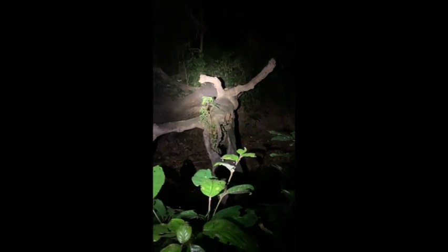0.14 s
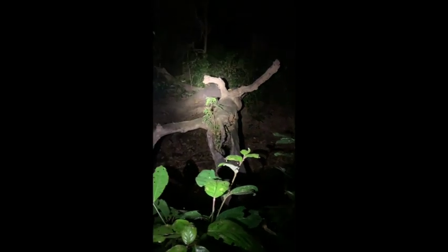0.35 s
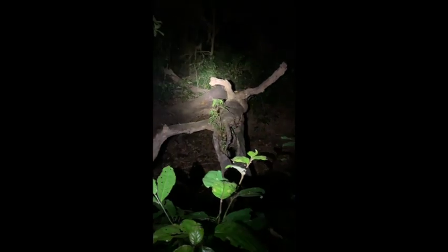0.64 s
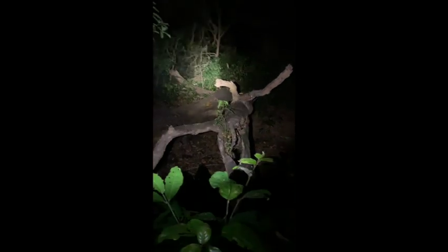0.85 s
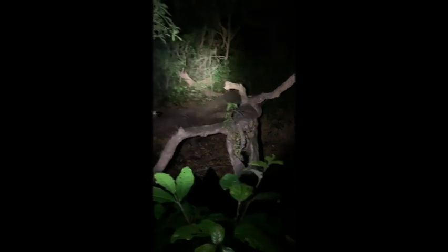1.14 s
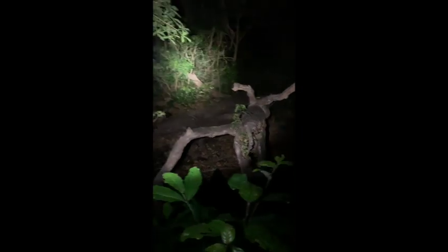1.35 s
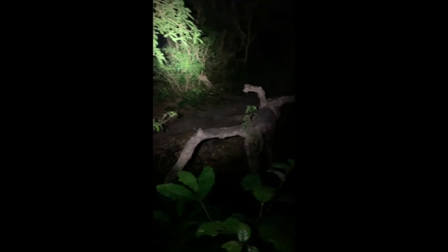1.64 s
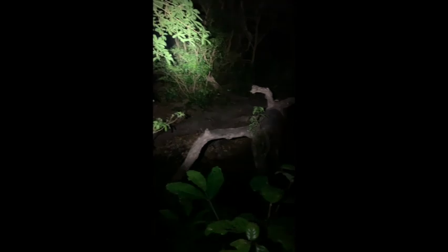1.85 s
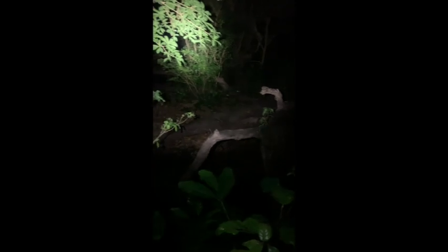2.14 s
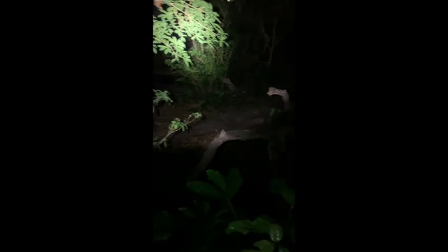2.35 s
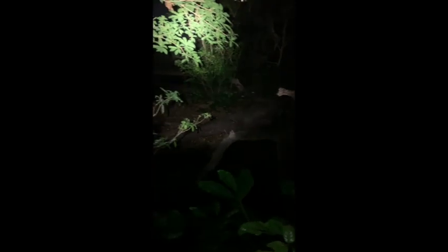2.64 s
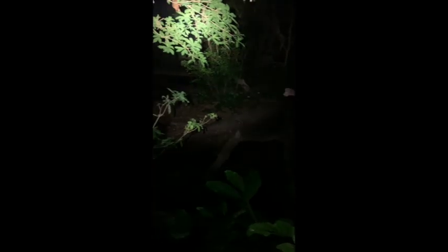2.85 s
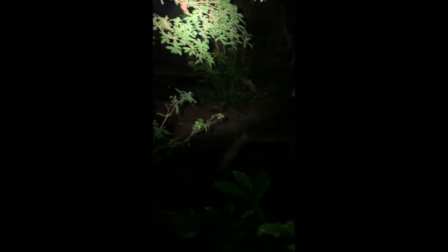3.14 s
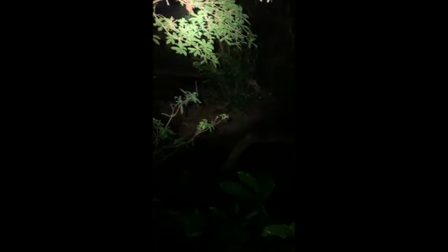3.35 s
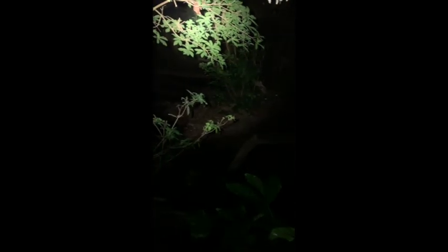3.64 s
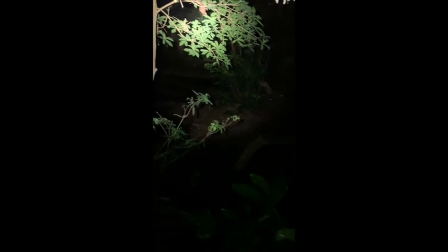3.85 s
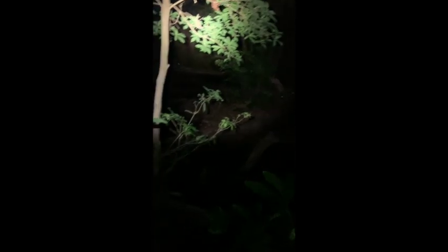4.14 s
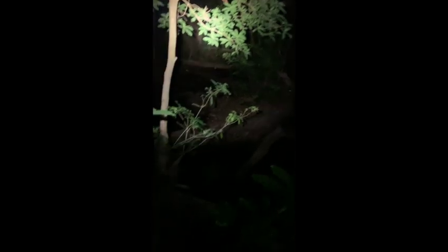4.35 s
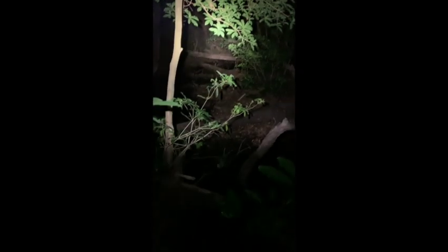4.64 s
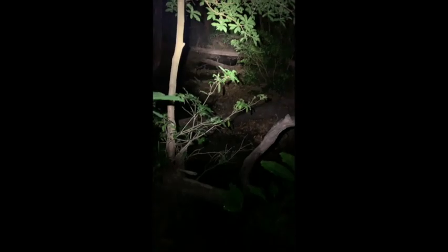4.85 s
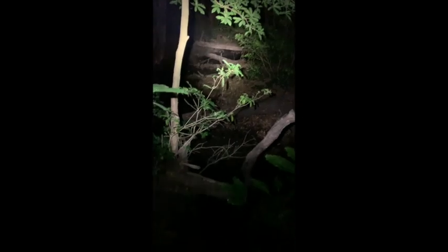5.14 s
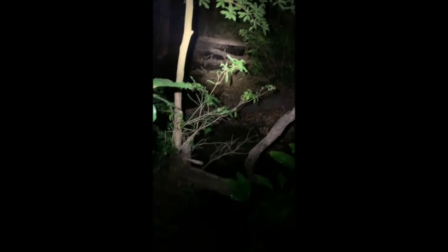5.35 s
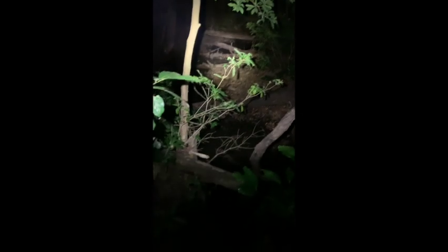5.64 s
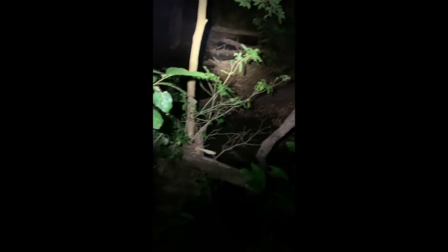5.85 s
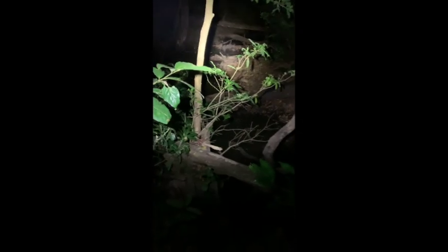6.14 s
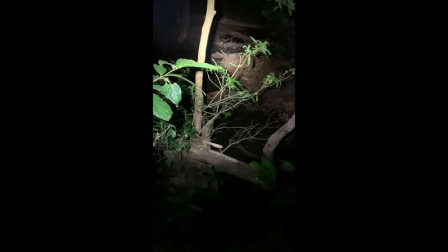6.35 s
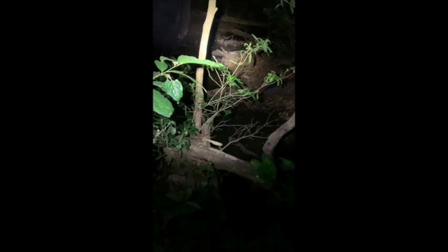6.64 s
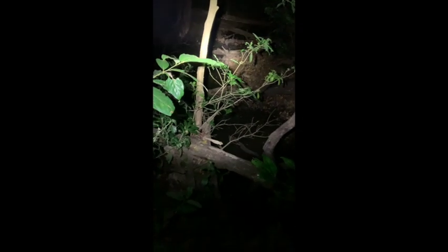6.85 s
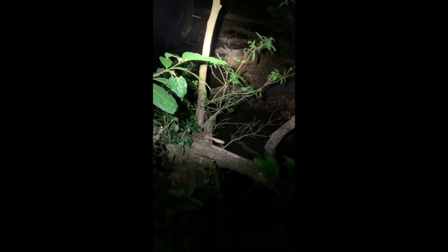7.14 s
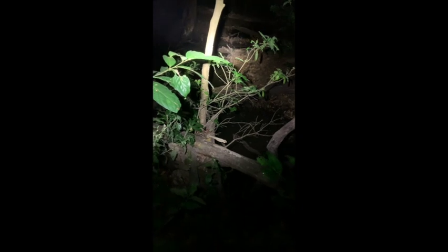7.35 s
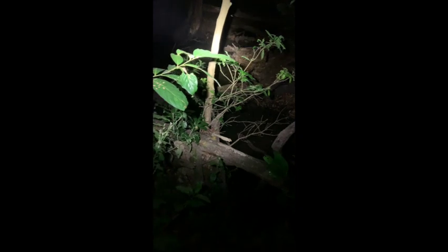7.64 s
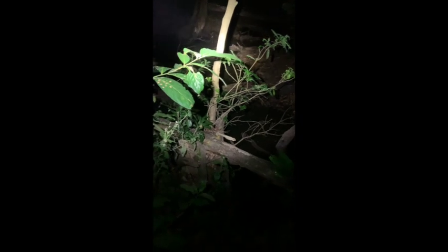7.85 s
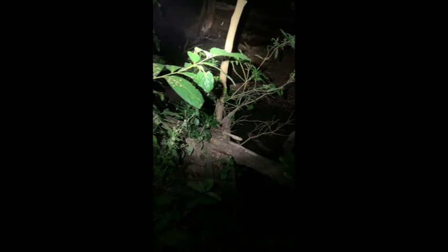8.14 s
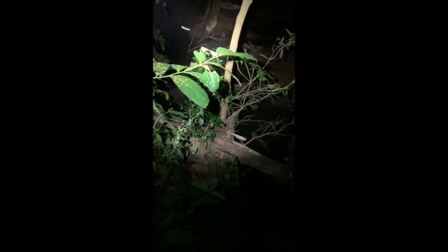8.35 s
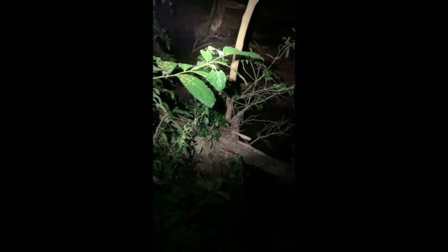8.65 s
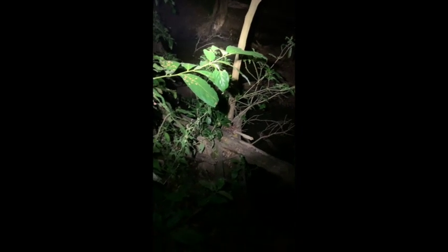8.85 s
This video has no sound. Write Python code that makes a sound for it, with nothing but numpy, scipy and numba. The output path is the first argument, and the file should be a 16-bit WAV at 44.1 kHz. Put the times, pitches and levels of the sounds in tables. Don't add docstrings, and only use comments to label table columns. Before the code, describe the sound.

A rainforest at night, filled with a continuous high drone of crickets and throbbing, swelling katydids. Twigs tick softly; then three near frogs call one after another, five quick notes each. Every note knocks and creaks faster into a short nasal whine, shut by a cluck. The second and third bouts are louder and nearly continuous. Handheld stereo phone, slight hand bumps, short echo from trees.

```python
import sys
import numpy as np
from scipy import signal
from scipy.fft import rfft, irfft
from scipy.io import wavfile
from scipy.ndimage import uniform_filter1d
from numba import njit

SR = 44100
rng = np.random.default_rng(int(sys.argv[2]) if len(sys.argv) > 2 else 0)


def volts_from_db(level):
    exponent = np.asarray(level, float) / 20
    return 10 ** exponent


def to_wav(sig):
    pcm = np.clip(np.atleast_2d(sig), -1, 1) * 32767
    pcm = np.round(pcm).astype(np.int16)
    wavfile.write(sys.argv[1], SR, pcm.T)


N = 396900
TIME = np.arange(N) / SR
FROG_LAG, CRICKET_LAG, KATYDID_LAG = 5., 4.3, 5.4


def curve(rows):
    s, *columns = np.transpose(rows)
    return [np.interp(TIME, s, c) for c in columns]


def unit(x):
    return x / np.sqrt(np.mean(x ** 2))


def smooth_twice(x, samples):
    return uniform_filter1d(uniform_filter1d(x, samples), samples)


@njit
def svf(x, hz, width):
    y, b, l = np.empty(len(x)), 0., 0.
    for i in range(len(x)):
        g, k = np.tan(np.pi * hz[i] / SR), width / hz[i]
        v = (b + g * (x[i] - l)) / (1 + g * (g + k))
        b, l, y[i] = 2 * v - b, l + 2 * g * v, k * v
    return y


def ring(x, hz, width_hz):
    hz = np.clip(hz + np.zeros(len(x)), 20, SR * .45)
    once = svf(x + 1e-18, hz, 1. * width_hz)
    return svf(once, hz, 1. * width_hz)


def band(x, lo_hz, hi_hz):
    return signal.sosfilt(signal.butter(4, [lo_hz, hi_hz], "bandpass", fs=SR, output="sos"), x)


@njit
def beat(hz, rough, chance, scatter):
    out, p, k = np.zeros(len(hz) + 1), 0., 0
    for i in range(len(hz)):
        step = hz[i] * np.exp(rough[i] * chance[k, 0]) / SR
        p += step
        if p >= 1:
            p, k = p - 1, k + 1
            size = np.exp(scatter * rough[i] * chance[k, 1]) / np.sqrt(hz[i] / SR)
            out[i] += size * p / step
            out[i + 1] += size * (1 - p / step)
    return out[:-1]


def pulses(hz, rough, scatter=1.14):
    chance = rng.standard_normal((N // 4, 2))
    return beat(hz + np.zeros(N), rough + np.zeros(N), chance, scatter)


def rasp(lo_hz, hi_hz, rate_hz, rough):
    return band(pulses(rate_hz, rough), lo_hz, hi_hz)


def walk(rate_hz):
    k = int(SR / rate_hz)
    return smooth_twice(np.repeat(rng.standard_normal(N // k + 1), k), k)[:N]


def spikes(rows):
    out = np.zeros(N)
    for s, db in rows:
        out[int(s * SR)] += volts_from_db(db)
    return out


def phrases(rows, fade_s):
    out = np.zeros(N)
    for s, length_s, open_db, close_db in rows:
        level = volts_from_db(np.interp(TIME, [s, s + length_s], [open_db, close_db]))
        out += level * (TIME >= s) * (TIME < s + length_s)
    return smooth_twice(out, int(fade_s * SR))


def ears(x, lag, pan_db=0.):
    late = irfft(rfft(x) * np.exp(-2j * np.pi * np.arange(N // 2 + 1) / N * lag), N)
    return np.array([x * volts_from_db(pan_db / 2), late * volts_from_db(-pan_db / 2)])


def trees(x, t60_s):
    t = np.arange(int(.6 * SR)) / SR
    tail = rng.standard_normal((2, len(t))) * 1000. ** (-t / t60_s) * np.clip(t / 0.0021, 0, 1)
    tail = tail / np.sqrt(np.sum(tail ** 2, 1))[:, None]
    return signal.fftconvolve(x[None], tail, axes=1)[:, :N]


# frequency in Hz, density in dB per Hz.
AIR_SPECTRUM = [(15, -27), (25, -9.5), (59, -1.5), (321, -8.5), (365, -6), (503, -12), (637, -11.5),
                (917, -11.5), (1240, -8.5), (1470, -9), (2160, -13.5), (4200, -13), (5460, -30.5),
                (9240, -120)]
# frequency in Hz, side minus mid in dB.
AIR_WIDTH = [(60, -16), (110, -5), (200, -3.5), (380, 1.5), (700, 8.5), (1290, 1.5), (2380, 8.5), (4400, 2),
             (8120, -35), (15000, -3.5)]
# time in seconds, gain in dB.
BREEZE_RUMBLE = [
    (4.9, 1),
    (5.5, 1),
    (6.6, -3),
]


def air():
    hz = np.maximum(np.arange(N // 2 + 1) * SR / N, 1)

    def gain(rows):
        row_hz, row_db = np.transpose(rows)
        return volts_from_db(np.interp(np.log(hz), np.log(row_hz), row_db))

    mid = rfft(rng.standard_normal(N)) * gain(AIR_SPECTRUM)
    side = rfft(rng.standard_normal(N)) * gain(AIR_SPECTRUM) * gain(AIR_WIDTH)
    ports = np.array([mid + side, mid - side])
    rumble = irfft(ports / (1 + (hz / 230) ** 4), N)
    sway = volts_from_db(0.5 * walk(3.03) + 2.8 * walk(18))
    breezy = irfft(ports, N) + (volts_from_db(curve(BREEZE_RUMBLE)[0]) - 1) * rumble
    return volts_from_db(-56.5) * sway * breezy / irfft(mid, N).std()


# time in seconds, level in dB, pitch in Hz.
HAND_BUMPS = [
    (3.892, -49, 97),
    (5.299, -52, 56.5),
    (5.392, -46, 70.0),
    (5.507, -42.5, 104.1),
    (5.789, -39.5, 121.5),
    (6.049, -47, 65),
]
# time in seconds, level in dB.
TWIG_TICKS = [
    (0.6518, -40.5),
    (0.9697, -51),
    (1.5424, -37.5),
    (2.7004, -43),
]


def handling():
    ticks = smooth_twice(spikes(TWIG_TICKS), 500) * 22 * pulses(2500, .45)
    out = volts_from_db(26) * band(ticks, 290, 12600)
    for s, db, hz in HAND_BUMPS:
        t = np.clip(TIME - s, 0, 1)
        fall = 1 + 1.13 * np.exp(-t / 0.0077)
        out += volts_from_db(db) * np.exp(-t / 0.023) * np.sin(2 * np.pi * hz * t * fall)
    return out


def singer(clicks, flicker_db, wet_db, lag=KATYDID_LAG):
    x = unit(clicks * volts_from_db(flicker_db * walk(12)))
    return unit(ears(x, lag) + volts_from_db(wet_db) * trees(x, 0.18))


def distant_insects():
    crickets = volts_from_db(-52) * singer(rasp(4360, 5420, 4000, .4), 1.1, 0.55, CRICKET_LAG)
    katydids = band(rasp(6070, 8340, 4000, .4), 6070, 8340)
    return crickets + volts_from_db(-55.5) * singer(katydids, 3.3, -19)


# time in seconds, level in dB.
LOW_CRICKET_EFFORT = [(0.0, -48.5), (0.39, -56), (0.54, -45), (1.31, -51), (1.6, -42.5), (1.9, -61.5),
                      (2.44, -43.5), (2.49, -54), (3.09, -46.5), (3.98, -53.5), (4.35, -43.5),
                      (4.54, -56.5), (6.72, -46.5), (6.77, -51.5), (8.82, -46.5), (8.87, -50)]


def low_cricket():
    strokes = pulses(127, .05)
    wing = ring(strokes, 4587, 190) + volts_from_db(-0.5) * ring(strokes, 4740, 190)
    return volts_from_db(8 + curve(LOW_CRICKET_EFFORT)[0]) * singer(band(wing, 4170, 5000), 1.3, -6.5, CRICKET_LAG)


def high_cricket():
    wing = ring(pulses(68, .1) + pulses(146, .1), 5460, 440)
    level = volts_from_db(-42.5 + 1.5 * np.cos(2 * np.pi * (1.81 * TIME - .07)))
    return level * singer(band(wing, 5200, 5710), 2.2, -4.5, CRICKET_LAG)


# time in seconds, throbs so far.
THROB_COUNT = [
    (.1, 0.53),
    (.7, 2.44),
    (1.4, 5.12),
    (4.1, 13),
    (4.7, 16.64),
    (8.9, 31.1),
]


def throbbing_katydid():
    level = volts_from_db(-45.5 + 4.0 * np.cos(2 * np.pi * curve(THROB_COUNT)[0]))
    return level * singer(ring(rasp(7500, 8735, 2500, 0.37), 8263, 1300), 1.4, -40)


# start in seconds, length in seconds, opening level in dB, closing level in dB.
KATYDID_SWELLS = [
    (0., 0.78, -50.5, -43.5),
    (.92, 1.6, -49, -46),
    (2.33, 0.68, -47.5, -37),
    (3.42, 0.82, -48.5, -46),
    (4.43, 1.18, -48, -43),
    (5.7, 0.782, -53.5, -36),
    (6.5, 1.09, -49, -47),
    (7.82, 0.87, -48.5, -34.5),
]


def swelling_katydid():
    level = volts_from_db(-62.5) + volts_from_db(-2.5) * phrases(KATYDID_SWELLS, 0.2)
    return level * singer(ring(rasp(9550, 13200, 4000, 0.36), 11910, 3800), 1.7, -6)


# start in seconds, length in seconds, opening level in dB, closing level in dB.
BUZZER_CHIRPS = [
    (.94, 0.083, -49, -51),
    (3.2, 0.21, -52, -61),
    (6.08, 0.1837, -58, -54),
    (8.5, 0.25, -58, -46),
]


def thin_buzzer():
    return phrases(BUZZER_CHIRPS, 0.016) * singer(rasp(9000, 9500, 2500, .4), 2.6, -11)


def stuttering_katydid():
    wing = ring(band(rasp(13200, 14900, 1500, 0.36), 13100, 14900), 13850, 1600)
    strokes = uniform_filter1d(uniform_filter1d(pulses(8, .2), 2000), 1200)
    return volts_from_db(-44) * singer(wing * (.75 + 30 * strokes), 2.2, -6.5)


def insects():
    crickets = low_cricket() + high_cricket()
    katydids = throbbing_katydid() + swelling_katydid() + thin_buzzer() + stuttering_katydid()
    return distant_insects() + crickets + katydids


# start in seconds, length in seconds, opening level in dB, closing level in dB.
LEAF_RUSTLES = [
    (2.95, .125, -52, -47.5),
    (3.308, .012, -57, -56),
]


def leaves():
    crackle = band(pulses(900, .6), 700, 3300)
    return phrases(LEAF_RUSTLES, .008) * unit(ears(crackle, FROG_LAG) + trees(crackle, 0.13))


# start in seconds, length in seconds, opening level in dB, closing level in dB.
FAR_FROG_PHRASES = [
    (0., 1, -62.5, -75),
    (3.13, 1.36, -65, -66.5),
    (8.4, .44, -49, -53),
]


def far_frogs():
    folds = pulses(300, .4)
    croak = ring(folds, 1600 + 300 * walk(3.0), 900) + volts_from_db(-3) * ring(folds, 740, 500)
    blurred = unit(ears(croak, 4.46) + volts_from_db(15) * trees(croak, 0.19))
    return volts_from_db(3) * phrases(FAR_FROG_PHRASES, 0.1) * blurred


def cluck(s, db, hz):
    t = np.arange(int(0.035 * SR)) / SR
    out, i = np.zeros(N), int(s * SR)
    swell = np.sin(np.pi * (t / t[-1]) ** 0.29) ** 2
    out[i:i + len(t)] = volts_from_db(db) * swell * np.sin(2 * np.pi * hz * t)
    return out


# time in seconds, peak in dB, pitch in Hz.
SAC_CLUCKS = [(1.541, -42, 813), (2.91, -43, 1012), (3.148, -50, 694), (3.236, -50, 635), (3.312, -51, 510),
              (3.361, -41, 697), (3.893, -38.5, 624.7), (4.709, -30.5, 606.5), (5.112, -46, 694),
              (5.294, -40, 599.4), (5.379, -37, 610), (5.569, -36.5, 827.3), (6.051, -33, 906),
              (6.543, -37.5, 600), (6.65, -34, 666), (6.786, -26.5, 655.7), (7.179, -25.5, 1031),
              (7.564, -24.5, 1022), (7.964, -33, 939), (8.346, -29, 673), (8.737, -42, 601)]


def clucks(gulps):
    return sum(cluck(*row) for row in SAC_CLUCKS + gulps)


# time in seconds, peak in dB.
FIRST_FROG_KNOCKS = [
    (1.2002, -72),
    (1.5394, -25),
    (1.6954, -22),
    (2.0094, -27),
    (2.1695, -23),
    (2.6634, -29),
    (2.8994, -20),
]
# time in seconds, peak in dB.
SECOND_FROG_KNOCKS = [(4.809, -27.5), (4.826, -22.5), (4.845, -17.5), (4.887, -16), (5.111, -18),
                      (5.231, -23.5), (5.248, -19), (5.271, -16.5), (5.294, -17), (5.395, -26),
                      (5.494, -28), (5.69, -25), (5.705, -20), (5.732, -14.5), (5.762, -15), (5.856, -17.5),
                      (5.997, -23), (6.179, -25), (6.194, -19), (6.223, -18), (6.247, -15), (6.325, -35),
                      (6.383, -23)]
# time in seconds, peak in dB.
THIRD_FROG_KNOCKS = [(6.647, -28), (6.881, -29), (6.895, -20.5), (6.92, -15.5), (6.939, -20),
                     (7.168, -18.5), (7.27, -33), (7.283, -17.5), (7.316, -6.5), (7.344, -14),
                     (7.533, -19.5), (7.554, -18), (7.639, -30), (7.671, -17), (7.704, -7.5), (7.733, -14),
                     (7.748, -15), (7.768, -24), (7.786, -26), (7.95, -14.5), (8.042, -30.5),
                     (8.075, -20.5), (8.106, -13.5), (8.146, -13.5), (8.204, -26)]


def fold_knocks():
    knocks = volts_from_db(-2) * spikes(SECOND_FROG_KNOCKS + THIRD_FROG_KNOCKS + FIRST_FROG_KNOCKS)
    return knocks + volts_from_db(-3) * np.roll(knocks, int(.0045 * SR))


# start in seconds, length in seconds, opening level in dB, closing level in dB.
FROG_NOTES = [(0.799, 0.29, -47.5, -37.5), (1.188, 0.38, -39, -40), (1.677, 0.36, -40, -38),
              (2.158, 0.34, -36.5, -35.5), (2.655, 0.27, -36, -39.5), (4.554, 0.17, -40, -26),
              (4.811, .32, -27.5, -24), (5.22, .37, -28.5, -30.5), (5.681, .39, -31, -28),
              (6.169, 0.38, -34, -29), (6.641, .155, -40.5, -31.5), (6.89, 0.29, -34, -29.5),
              (7.27, 0.29, -35.5, -28), (7.661, 0.3, -36, -28.5), (8.07, 0.28, -33, -33.5)]
# seconds after the start, from Hz, to Hz, glide in seconds, throat ring in dB.
FROG_WHINES = [(.04, 455, 540, .19, -5.5), (.11, 351, 439, .1, -5.5), (.12, 405, 464, .19, -1.5),
               (.11, 392, 433, .13, 0), (.065, 395, 420, .04, -1), (.005, 390, 543, .155, -54),
               (.19, 275, 365, .06, -4), (.21, 268, 362, 0.064, -2.5), (.2, 346, 405, .14, -2.5),
               (.18, 356, 438, 0.18, -9.5), (.02, 420, 550, .11, -7), (.11, 331, 421, .17, 0),
               (.17, 350, 395, .12, -2), (.17, 346, 370, 0.12, -3), (.13, 349, 361, 0.118, -8)]
# creak rate at the start in Hz, share of the whine rate reached before locking,
# vocal sac in dB, attack in seconds, sag at locking in dB.
FROG_HABITS = [
    (250.2, .96, -7, 0.0072, -2),
    (70, .9, -11.5, .06, -5),
    (96.15, .55, -7, 0.047, -4),
]
WHINE_GRIT = [.015, .022, .038, .07, .075]
WHINE_BEND = [.7, .7, 1.05]
CREAK_HEAD = [1, -0.5, -4.5]
CREAK_THROAT = [-0.5, 0.5, 5.5]


def frog_effort():
    hz, rough = np.full(N, 200.), np.full(N, .1)
    gain, throat_db, head_db, sac_db, edge = np.zeros((5, N))
    who, gulps = np.zeros(N, int), []
    release_s, edge_s = .02, .027
    for k, (note, whine_row) in enumerate(zip(FROG_NOTES, FROG_WHINES)):
        s, length, open_db, close_db = note
        lock, from_hz, to_hz, glide, ease_db = whine_row
        frog, place = divmod(k, len(WHINE_GRIT))
        first_hz, share, low_db, attack, sag_db = FROG_HABITS[frog]
        if place == 0:
            first_hz, share, low_db, attack, sag_db = 269, .9, low_db - 3.5, .015, 0
        else:
            gulps.append((s + length - .017, close_db - 10.5, 494))
        on = slice(int(s * SR), int((s + length) * SR))
        t = TIME[on] - s
        locked = t >= lock
        settled = np.clip(t / lock, 0, 1)

        creak = first_hz * (share * from_hz / first_hz) ** settled ** 1.4
        whine = from_hz + (to_hz - from_hz) * np.clip((t - lock) / glide, 0, 1) ** WHINE_BEND[frog]
        droop = 1 - .12 * np.clip(1 - (length - t) / release_s, 0, 1)
        hz[on] = np.where(locked, whine, creak) * droop
        grit = WHINE_GRIT[place] + (.12 - WHINE_GRIT[place]) * (1 - settled ** 2)
        rough[on] = np.where(t < length - release_s, grit, .11)

        corners_s = [attack * 0.5, attack, max(lock, attack) + 0.021,
                     length - 2 * release_s, length - release_s, length]
        shape_db = np.interp(t, corners_s, [-12, 0, sag_db, 0, 0, -4.5])
        gain[on] = volts_from_db(open_db + (close_db - open_db) * t / length + shape_db)
        creak_db = (CREAK_THROAT[frog] + 2.5 - 1.08 * place) * (place > 0)
        throat_db[on] = np.where(locked, ease_db, creak_db)
        sac_db[on] = low_db
        head_db[on] = CREAK_HEAD[frog] * (1 - settled ** 3)
        who[TIME >= s - .03] = frog
        edge[(abs(TIME - s) < edge_s) | (abs(TIME - s - length) < edge_s)] = 1
    return hz, rough, gain, throat_db, head_db, sac_db, who, edge, gulps


THROAT_RING_HZ = [2080, 2170, 2290]
VOICE_TOP_HZ = [2350, 2450, 2750]
HEAD_RING = [0.5, 4, 7]
SIZZLE = [-10, -11.5, -6.5]
DISTANCE_DB = [-3.5, 0., .5]
PAN_DB = [-.3, -2.5, -5.]


def frogs():
    hz, rough, gain, throat_db, head_db, sac_db, who, edge, gulps = frog_effort()
    throat_db, head_smooth_db = uniform_filter1d(throat_db, 1500), uniform_filter1d(head_db, 1500)
    knocks = fold_knocks()
    folds = pulses(hz, rough, scatter=2.) + volts_from_db(-17) * rng.standard_normal(N)
    folds *= uniform_filter1d(gain, 200) * volts_from_db(2 * walk(40) + 1.5 * walk(16))

    throat = folds * volts_from_db(throat_db) + volts_from_db(11 - 7 * edge) * knocks
    head = (volts_from_db(8.5) * folds + volts_from_db(22) * knocks) * volts_from_db(head_smooth_db)
    sac = folds * volts_from_db(sac_db - .5 * head_db) + volts_from_db(14.5 + np.where(edge, -4.5, -10)) * knocks

    voice = volts_from_db(22.0) * ring(throat, np.take(THROAT_RING_HZ, who), 219)
    voice += band(head, 1070.0, 2072) + volts_from_db(np.take(HEAD_RING, who)) * ring(head, 1700, 397)
    voice += volts_from_db(19.5) * ring(sac, 657, 169) + volts_from_db(18) * ring(sac, 1062, 139)
    voice = sum(volts_from_db(DISTANCE_DB[k]) * band(voice * (who == k), 528, VOICE_TOP_HZ[k]) for k in range(3))
    voice += volts_from_db(np.take(SIZZLE, who)) * band(folds, 2708, 3770)
    voice += clucks(gulps)
    near = sum(ears(voice * (who == k), FROG_LAG, PAN_DB[k]) for k in range(3))
    return near + volts_from_db(-9) * trees(voice, .35)


def scene():
    return air() + handling() + insects() + leaves() + far_frogs() + frogs()


def top_cut(x):
    return signal.sosfilt(signal.butter(12, 15200, fs=SR, output="sos"), x)


def record(dry):
    end_s, fade_s = 8.893, 0.0023
    mix = dry * np.clip((end_s - TIME) / fade_s, 0, 1)
    return top_cut(mix)


dry = scene()
out = record(dry)
to_wav(out)
```